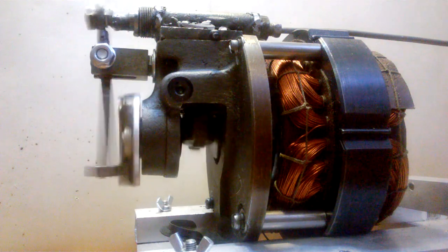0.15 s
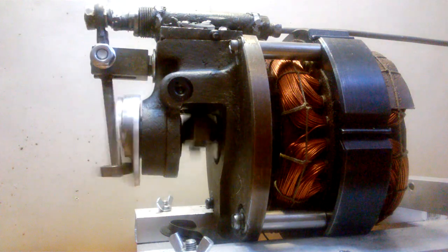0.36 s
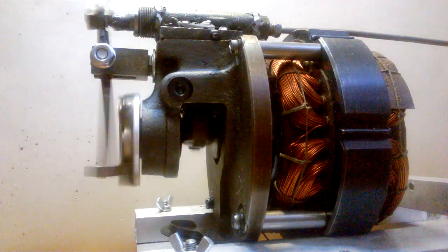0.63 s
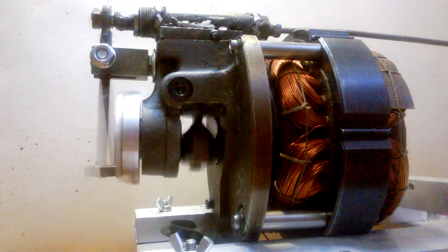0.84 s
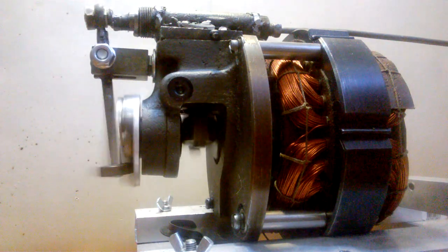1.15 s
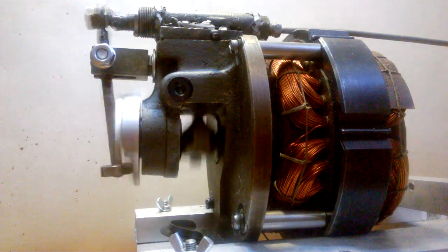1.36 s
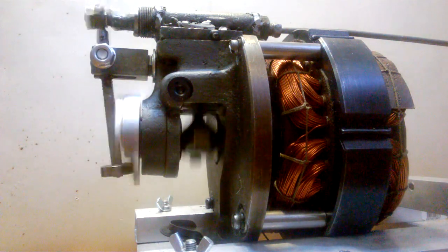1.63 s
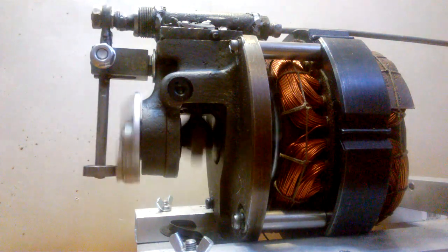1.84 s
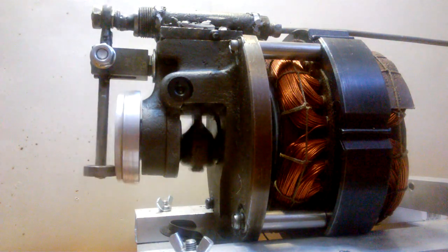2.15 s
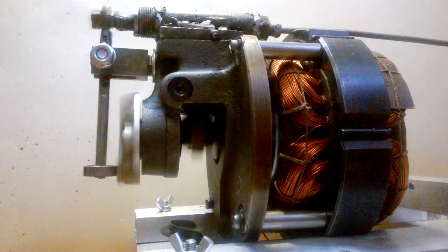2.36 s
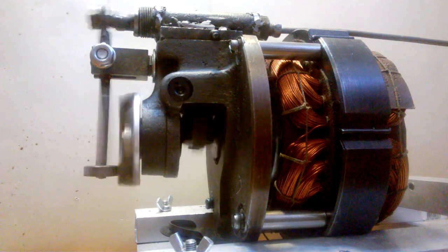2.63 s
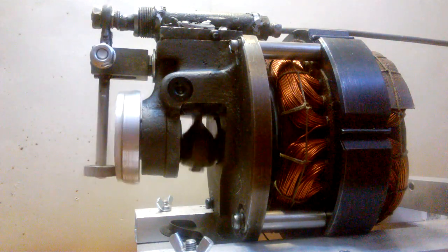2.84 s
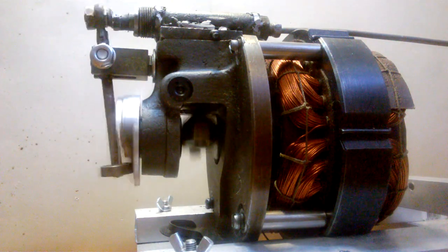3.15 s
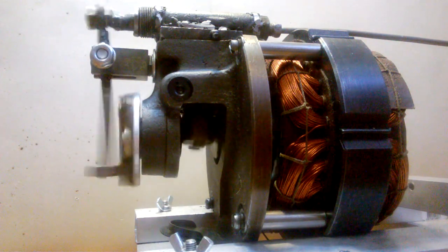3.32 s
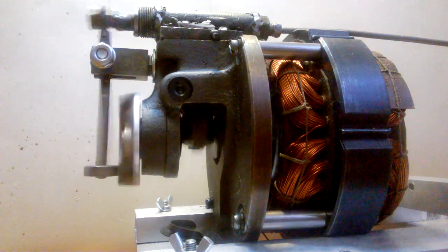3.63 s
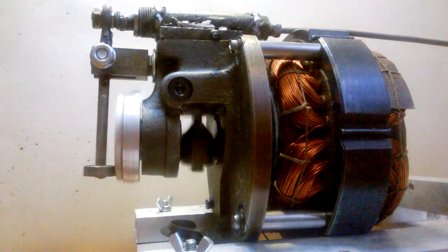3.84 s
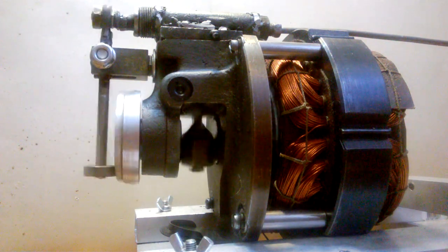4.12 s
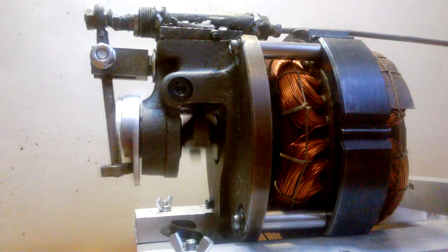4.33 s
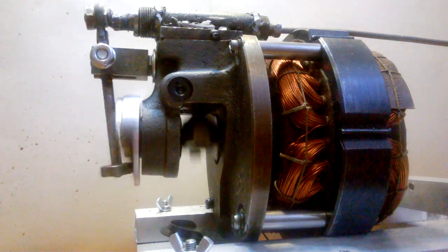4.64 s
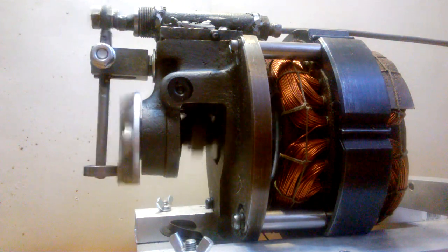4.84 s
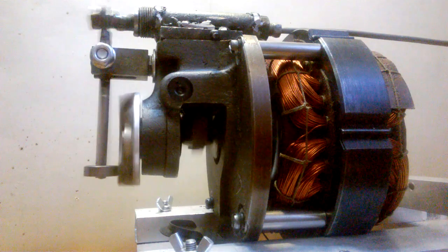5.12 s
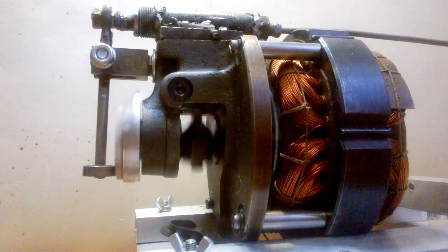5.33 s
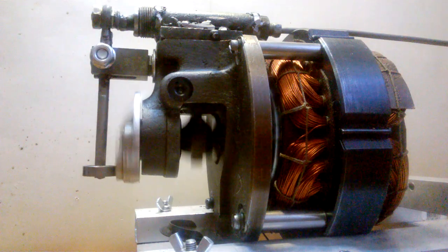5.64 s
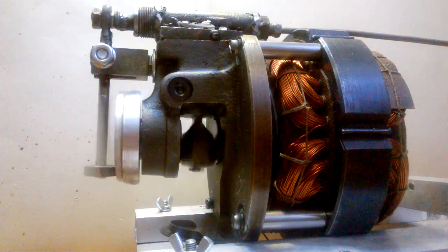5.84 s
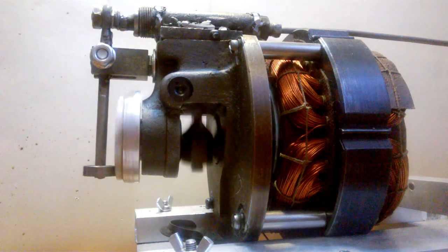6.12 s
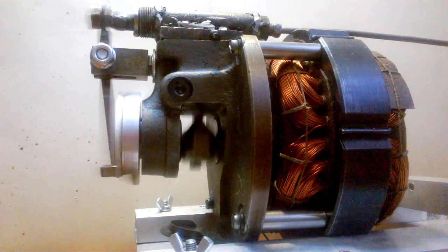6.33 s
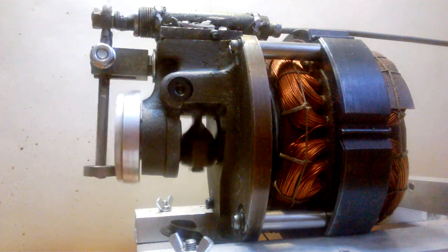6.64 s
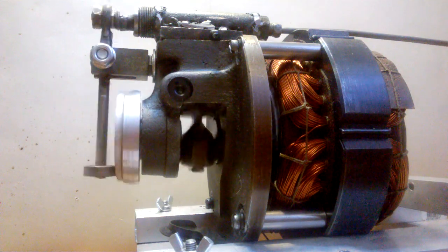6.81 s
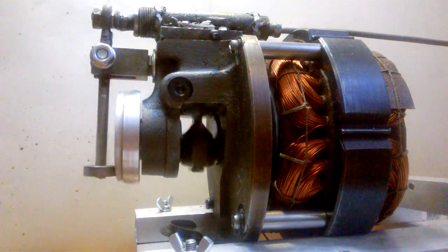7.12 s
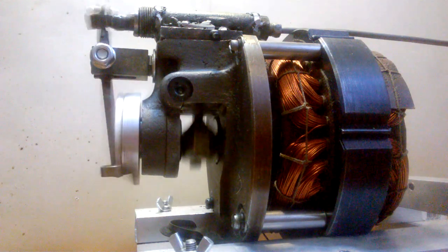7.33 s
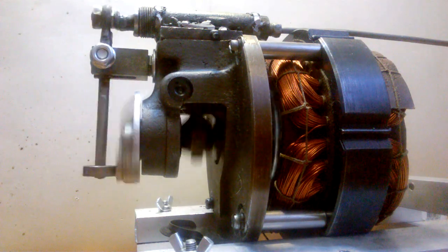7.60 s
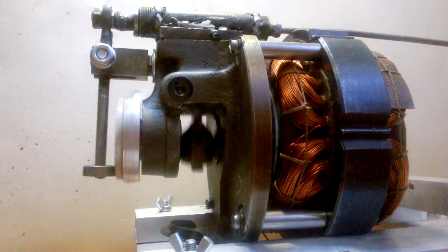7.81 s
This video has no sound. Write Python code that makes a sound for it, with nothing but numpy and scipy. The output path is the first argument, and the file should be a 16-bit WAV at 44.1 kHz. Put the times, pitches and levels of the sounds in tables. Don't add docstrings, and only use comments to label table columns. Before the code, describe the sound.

Close, dry and mono: a small air-driven piston engine on a bench in a small room. About eight times a second a metallic clack and puff land together with a dull bench thump, then hiss, another thump and a high whistling inlet jet. Linkage rattles throughout. Loud and bright at first, it quickly weakens, slows slightly and settles much quieter over a faint low hum.

```python
import sys
import numpy as np
from scipy import signal
from scipy.fft import rfft, irfft, next_fast_len
from scipy.io import wavfile
from scipy.ndimage import uniform_filter1d

SR = 44100
rng = np.random.default_rng(int(sys.argv[2]) if len(sys.argv) > 2 else 0)


def convert_level_to_amplitude(level_db):
    exponent = np.asarray(level_db, float) / 20
    return 10 ** exponent


def digitize_waveform(pressure):
    field = np.atleast_2d(pressure).T
    bounded = np.clip(field, -1, 1)
    quanta = np.round(bounded * 32767).astype(np.int16)
    wavfile.write(sys.argv[1], SR, quanta)


N = 351477
LENGTH = next_fast_len(N)
TIME, HZ = np.arange(N) / SR, np.fft.rfftfreq(LENGTH, 1 / SR)
RUN_DOWN_S = 4.93

# (frequency [Hz], width [Hz], level [dB])
PASSAGES = [(4384, 38, -15.5), (4880, 26, -13.5), (5330, 39, -12.5), (6390, 410, -19), (6890, 27, -12),
            (7016, 8.6, -8.5), (7510, 30, -11.5), (7840, 120, -16.5), (8360, 76, -17), (9115, 72, -4.5),
            (9760, 45, -5), (10045, 210, -5), (10420, 66, -16.5), (10640, 43, -10), (11150, 140, -6),
            (11720, 150, -9), (12360, 130, -7.5), (12800, 180, 0), (13600, 52, -17), (13750, 150, -4),
            (14900, 81, -30), (15000, 100, -38)]
# (frequency [Hz], width [Hz], level [dB])
RODS = [(2076, 110, -14.5), (2700, 24, -18), (2778, 39, -4.5), (2948, 78, 0), (3085, 68, 6),
        (3550, 27, -5.5), (3770, 210, -13.5)]


def evened(x):
    return x / np.sqrt(np.mean(x ** 2) + 1e-20)


def columns(table, at):
    where, *values = np.transpose(table)
    return [np.interp(at, where, v) for v in values]


def follow(part, s):
    # (time [s], level [dB])
    pressure = [(0, 0), (.5, -2), (1.05, -3), (1.4, -5), (2, -7), (2.6, -9), (3.5, -11.5), (4.4, -12.5),
                (5.2, -13.5), (6, -15), (7, -15.5), (7.97, -16)]
    full_db, slope = part
    return full_db + slope * columns(pressure, s)[0]


def filtered(x, gain):
    return irfft(rfft(x, LENGTH) * gain, LENGTH)[:N]


def ring(x, modes, between_db):
    gain = convert_level_to_amplitude(between_db) + sum(convert_level_to_amplitude(db) / (1 + 2j * (HZ - hz) / width) for hz, width, db in modes)
    return filtered(x, gain)


def tinted(colour):
    hz, db = np.transpose(colour)
    gain = convert_level_to_amplitude(np.interp(np.log(HZ + 1), np.log(hz), db))
    return evened(filtered(rng.standard_normal(LENGTH), gain))


def air(colour):
    # (frequency [Hz], width [Hz], level [dB])
    more_passages = [(5070, 93, -13.5), (5600, 41, -21), (6080, 32, -12)]
    modes = [(hz, 1.01 * width, db) for hz, width, db in PASSAGES + more_passages]
    return evened(ring(tinted(colour), modes, -24))


def flutter(db, hz):
    size = int(SR / hz)
    swell = uniform_filter1d(uniform_filter1d(rng.standard_normal(N), size), size)
    return convert_level_to_amplitude(db * evened(swell))


def whistle(hz, width):
    spin = np.exp(2j * np.pi * np.cumsum(hz) / SR)
    r = np.exp(-np.pi * width / SR)
    smooth = signal.lfilter([1], [1, -2 * r, r * r], rng.standard_normal(N) / spin)
    return evened((spin * smooth).real)


def crank():
    # (turn, time [s])
    dead_centres = [(0, .064), (4, .5615), (8, 1.069), (14, 1.8535), (18, 2.394), (22, 2.951), (27, 3.669),
                    (32, 4.404), (37, 5.162), (41, 5.788), (46, 6.593), (50, 7.257), (54, 7.937)]
    longer_s = .00092
    turn, s = np.transpose(dead_centres)
    n = np.arange(-1, turn[-1] + 2)
    marks = np.interp(n, turn, s - longer_s / 2 * turn ** 2) + longer_s / 2 * n ** 2
    marks[0] = 2 * marks[1] - marks[2]
    marks[-1] = 2 * marks[-2] - marks[-3]
    turns = np.interp(TIME, marks, n)
    return np.floor(turns).astype(int), turns % 1, marks


def inlet(share):
    cracks, opened, overshoots, settles, shuts = 0.39, .47, 0.503, 0.67, 0.95
    shut_db, cracked_db, end_db = -42, -5, -2
    pitch_cracked, pitch_over, pitch_end = 0.854, 1.053, 0.97
    lifting = (cracks + opened) / 2 - .005
    at = [0, lifting, opened, overshoots, settles, shuts, 1]
    rise = np.interp(share, at, [pitch_cracked, pitch_cracked, 1, pitch_over, .99, .985, pitch_end])
    at = [0, .08, cracks, lifting, opened, shuts, 1]
    return np.interp(share, at, [-25, shut_db, shut_db, cracked_db, -.5, -.7, end_db]), rise


def room():
    # (time [s], level [dB])
    hum_swell = [(0, -38.5), (1, -40), (1.6, -43.5), (2.1, -45.5), (2.8, -43.5), (3.6, -46), (4.5, -52.5),
                 (6, -46.5), (7.97, -52.5)]
    # (frequency [Hz], level [dB])
    rumble = [(20, -24), (31, -12), (40, -2), (50, 0), (62, -3), (79, -6), (92, -20), (110, -40)]
    # (frequency [Hz], level [dB])
    room_air = [(90, -26), (200, 11.5), (600, -6.5), (1500, -0.5), (3000, -42), (16000, -30)]
    hum = np.sqrt(2) * np.sin(2 * np.pi * 49 * TIME) * flutter(1.3, 5.0)
    low = hum + convert_level_to_amplitude(-1.5) * tinted(rumble)
    return convert_level_to_amplitude(columns(hum_swell, TIME)[0] - 5) * low + convert_level_to_amplitude(-51.5) * tinted(room_air)


def walls(x):
    decay_s = 0.15
    taps = np.zeros(8000)
    at = np.arange(200, 7980, 20) + rng.integers(0, 20, 389)
    taps[at] = rng.choice([-1., 1.], 389) * convert_level_to_amplitude(-60 * at / SR / decay_s)
    return signal.oaconvolve(x, taps / np.linalg.norm(taps))[:N]


def leak(share):
    # (frequency [Hz], level [dB])
    leak_colour = [(300, -31), (1500, -3), (2300, -16.5), (4400, 3), (5100, -5), (5700, 0.5), (6100, 0),
                   (7000, 4.5), (9000, -6.5), (10000, -1), (12000, -9), (14000, -15), (16000, -8)]
    sway_db = -1.7 * np.sin(2 * np.pi * (share + 0.0059))
    level_db = follow((-28.5, .87), TIME) + 4.5 + sway_db
    return air(leak_colour) * convert_level_to_amplitude(level_db) * flutter(0.42, 130)


def roar(share):
    stroke = np.clip((share - .38) / 0.82, 0, 1)
    hz = 4250 + 380 * np.sin(np.pi * stroke)
    level_db = follow((-37, .5), TIME) + 1.6 * inlet(share)[0]
    return whistle(hz, 630) * convert_level_to_amplitude(level_db) * flutter(1.8, 200)


def groan(share):
    # (time [s], level [dB])
    drag = [(0, -44), (1, -40), (2.1, -56.5), (3.6, -47.5), (5.2, -49), (7.97, -49)]
    rubs, rub_rise, rub_fall, growth_db = 0.81, .08, 0.049, 11.5
    hz = 436 * (1 + 0.022 * evened(uniform_filter1d(rng.standard_normal(N), size=400)))
    at = [0, rub_fall, rubs - rub_rise, rubs, .94, 1]
    rub_db = np.interp(share, at, [-4, -60, -60, -1.5, growth_db - 4.5, -4])
    tone = np.sqrt(2) * np.sin(2 * np.pi * np.cumsum(hz) / SR)
    return tone * convert_level_to_amplitude(columns(drag, TIME)[0] + rub_db) * flutter(1.2, 60)


def contacts(share):
    # (share of the turn, frame at speed [dB], frame run down [dB], rods [dB],
    # valve link [dB])
    touch = [(0.039, -0.5, 7, 1.5, 2.5), (0.168, 2, 5.5, 8, -11), (0.259, -2.5, -3, -7, 3.5),
             (0.378, 0.5, 5.5, -8, -5), (.44, -2, 3, -17, 1), (0.802, -15, -8, -5.5, 1),
             (.85, -8.5, -8.5, 0.5, -4), (0.902, -2.5, 4, 4.5, -12), (1.024, -1, 0, 12, -13)]
    width, loose_levels_db = 0.025, (-6, -11, -11, -10)
    at, *parts = np.transpose(touch)
    apart = (share[:, None] - at + .5) % 1 - .5
    humps = np.exp(-(apart / width) ** 2 / 2)
    return [20 * np.log10(convert_level_to_amplitude(loose_db) + humps @ convert_level_to_amplitude(db)) for db, loose_db in zip(parts, loose_levels_db)]


def linkage(marks, share):
    # (frequency [Hz], width [Hz], level [dB])
    frame = [(340, 128, -5.5), (568, 240, -15.5), (911, 50, -0.5), (957, 100, -5.5), (1017, 42, 0.5),
             (1057, 23, -7), (735, 100, -20), (455, 44, -14)]
    # (frequency [Hz], width [Hz], level [dB])
    cradle = [(429, 79, -8.5), (630, 63, -9.5), (830, 59, -7.5), (940, 60, -12), (994, 50, 0),
              (1063, 54, -9)]
    # (frequency [Hz], width [Hz], level [dB])
    link = [(1365, 31, -3), (1530, 92, 4.5), (1661, 33, 3)]
    count, jitter_s = 110, .00007
    out, turns = 0, len(marks) - 1
    level_db = follow((-31, 0.94), TIME)
    fast_db, slow_db, rods_db, link_db = contacts(share)
    late = np.clip(TIME / RUN_DOWN_S, .02, .98)
    fast_db = fast_db + 10 * np.log10(1 - late)
    slow_db = slow_db + 10 * np.log10(late)
    parts = [(frame, slow_db, 0.5), (RODS, rods_db, -2.5), (link, link_db, -8), (cradle, fast_db, -0.94)]
    for modes, contact_db, offset_db in parts:
        angle = (np.arange(count) + rng.random(count)) / count
        at = marks[:-1, None] + angle * np.diff(marks)[:, None]
        at = at + jitter_s * rng.standard_normal((turns, count))
        size_db = 2.5 * rng.standard_normal(count) + 2.2 * rng.standard_normal((turns, count))
        size = rng.choice([-1., 1.], count) * convert_level_to_amplitude(size_db) * (at > 0) * (at * SR < N)
        index = np.clip(at * SR, 0, N - 1).astype(int)
        blows = np.bincount(index.ravel(), size.ravel(), N)
        rattle = ring(blows * convert_level_to_amplitude(contact_db + level_db), modes, -29.5)
        out = out + convert_level_to_amplitude(offset_db) * rattle / np.std(ring(blows, modes, -26.5))
    return out


def knocks(marks):
    # (turn, level [dB])
    odd_clacks = [(2, 0), (7, -1), (9, 0), (11, 1), (19, -1), (20, -11), (21, -3), (24, 5), (30, 3.5),
                  (31, 3), (32, 0), (39, 0), (41, 0), (43, -1), (44, 1.5), (51, 0.5), (52, -3.5)]
    # (share of the turn, level [dB], extra at speed [dB], share earlier or later when run down)
    thumps = [
        (.005, 3, 0.5, -0.0208),
        (0.148, -8, -7, 0.0048),
        (0.367, 0.5, -3.5, 0.00041),
        (0.49, -9.5, -35, -0.0011),
        (0.7, -15, 2, 0),
        (0.849, -17, 5, -0.0047),
    ]
    # (frequency [Hz], width [Hz], level [dB])
    block = [(345, 41, -1), (498, 46, -5), (624, 53, -4.5), (927, 37, 6.5), (1060, 42, -12), (1425, 12, -5),
             (1530, 26, -7.5), (1690, 21, -15), (1994, 19, -9)]
    # (frequency [Hz], width [Hz], level [dB])
    head_modes = [(602, 77, 1), (1390, 90, 0), (1600, 90, 1), (2040, 90, 3), (2320, 130, -13)]
    # (frequency [Hz], width [Hz], level [dB])
    bench = [(150, 40, -10.5), (184, 40, 0), (250, 60, -8)]
    # (dB at full pressure, dB per dB of pressure)
    clack_part, blow_part, thump_part, head_part = (-16.5, 0.91), (-25.5, 0.49), (-26.5, 0.68), (-30, 1.24)
    clack_spread_db, thump_spread_db = 1.2, .7
    clicks, blows, pushes = np.zeros((3, N + SR))
    s = marks[1:-1]
    chance = rng.standard_normal((len(s), 11))
    clack_db = follow(clack_part, s) + clack_spread_db * chance[:, 9]
    for turn, db in odd_clacks:
        clack_db[round(turn)] = follow(clack_part, s[round(turn)]) + db
    heavy_db = thump_spread_db * chance[:, 10]
    for start, hard_db, heft_db, length, luck in zip(s, clack_db, heavy_db, np.diff(marks)[1:], chance):
        for lag_s, db, c in zip((0, .0045, .008), (-1.5, -.1, -6), luck):
            clicks[int((start + lag_s * (1 + .08 * c)) * SR)] += convert_level_to_amplitude(hard_db + db + 0.33 * c)
        blows[int((start + .0025) * SR)] = convert_level_to_amplitude(follow(blow_part, start) + heft_db)
        late = min(start / RUN_DOWN_S, 1)
        for (share, db, fast_db, shift), c in zip(thumps, luck[3:]):
            push_db = db + fast_db * (1 - late) + follow(thump_part, start) + heft_db + .5 * c
            at_s = start + (share + shift * late) * length + .0006 * c
            pushes[int(at_s * SR)] += convert_level_to_amplitude(push_db)
    pushes = signal.oaconvolve(pushes, np.hanning(170) / 60)[:N]
    pushes = ring(pushes, [(190, 90, 0)], -50)
    clack = convert_level_to_amplitude(34.5) * ring(clicks[:N], RODS, -62)
    clack = clack + convert_level_to_amplitude(43.0) * ring(blows[:N], block, -51)
    head_db = follow(head_part, TIME) - follow(blow_part, TIME)
    head = ring(blows[:N] * convert_level_to_amplitude(head_db), head_modes, -33)
    return clack + convert_level_to_amplitude(36) * head + convert_level_to_amplitude(50.5) * ring(pushes, bench, -17)


def exhaust(turn, share, marks):
    # (frequency [Hz], level [dB])
    puff_colour = [(300, -5.5), (1500, -8), (2200, -28), (4000, 1.5), (6000, -9), (8500, 3.5),
                   (11000, -8.5), (12800, -15), (16000, -5.5)]
    # (frequency [Hz], level [dB])
    exhaust_colour = [(1500, -25), (2500, 7.5), (5000, -7), (7000, 7), (8400, 12.5), (9300, -6.5),
                      (11200, 4.5), (12500, -46), (16000, -31)]
    # (share of the turn, level [dB])
    port = [(0, 3.5), (.08, -4.5), (.32, -1.5), (.42, -16), (.6, -20), (.8, -15), (.96, -8), (1, 7.5)]
    spread_db, puff_s = .5, 0.013
    level_db = follow((-16.5, 0.89), marks) + spread_db * rng.standard_normal(len(marks))
    level_db = level_db[np.maximum(turn, 0) + 1]
    since_s = TIME - marks[turn + 1]
    burst = np.exp(-(since_s / puff_s) ** 3) * (turn >= 0)
    puff = air(puff_colour) * convert_level_to_amplitude(level_db + 2.5) * burst * flutter(2.3, 900)
    hiss_db = level_db - 4.5 + columns(port, share)[0]
    return puff + air(exhaust_colour) * convert_level_to_amplitude(hiss_db) * flutter(0.62, 270)


def inlet_jet(turn, share, marks):
    start_hz, sag_hz_per_s, spread_hz, spread_db = 12520, 238, 51, .5
    luck = rng.standard_normal((len(marks), 2))
    coming = turn + 1 + (share > .2)
    level_db = (follow((-15.5, 1.007), marks) + spread_db * luck[:, 0])[coming]
    inlet_db, rise = inlet(share)
    hz = (start_hz - sag_hz_per_s * marks + spread_hz * luck[:, 1])[coming] * rise
    edge_share = 0.27 + 0.46 * np.clip(1 - TIME / RUN_DOWN_S, 0, 1)
    jet = whistle(hz, 1630) + edge_share * whistle(1.02 * hz, 510)
    jet = jet * convert_level_to_amplitude(inlet_db) * flutter(0.92, 500)
    jet = ring(jet, [(mode_hz, 1.07 * width + 40, 0.86 * db) for mode_hz, width, db in PASSAGES], -32)
    jet = jet / np.sqrt(uniform_filter1d(jet ** 2, size=22050) + 1e-12)
    return jet * convert_level_to_amplitude(level_db - 2.0)


def scene():
    turn, share, marks = crank()
    breath = leak(share) + roar(share) + exhaust(turn, share, marks) + inlet_jet(turn, share, marks)
    engine = breath + groan(share) + linkage(marks, share) + knocks(marks)
    no_bass = signal.butter(6, 120, "high", fs=SR, output="sos")
    engine = signal.sosfilt(no_bass, engine)
    return np.tile(engine + convert_level_to_amplitude(-12.0) * walls(engine) + room(), (2, 1))


def band_limit(x):
    return signal.sosfilt(signal.butter(12, 15760, fs=SR, output="sos"), x)


def record(dry):
    top = .8
    rounded = top * np.tanh(dry / top)
    edge = signal.firwin(511, 15850, window=("kaiser", 9), fs=SR)[None]
    return band_limit(signal.oaconvolve(rounded, edge, "same"))


dry = scene()
out = record(dry)
digitize_waveform(out)
```